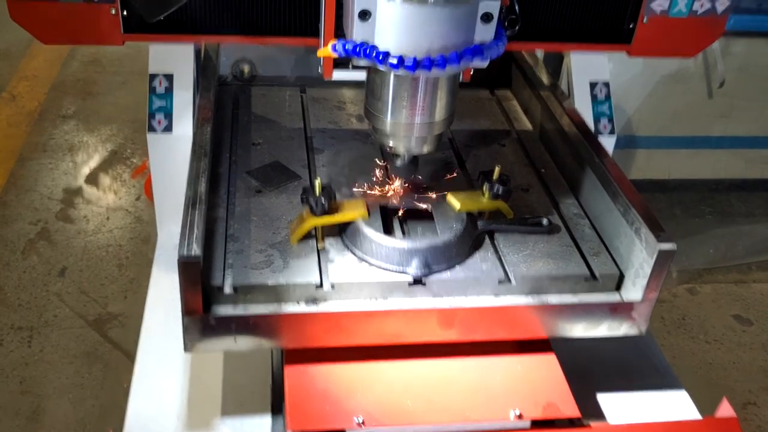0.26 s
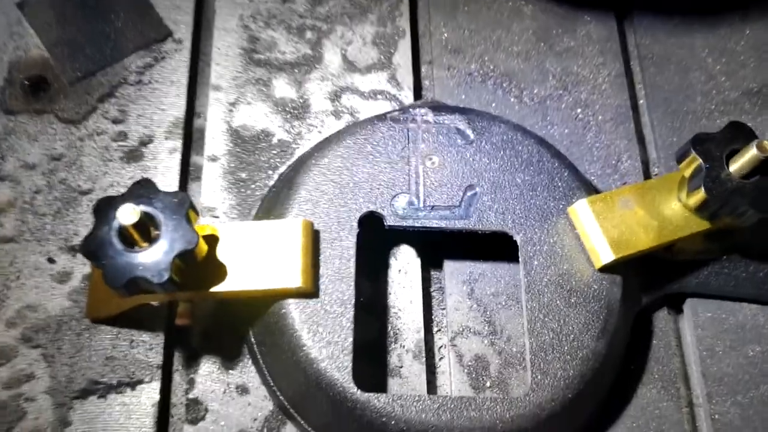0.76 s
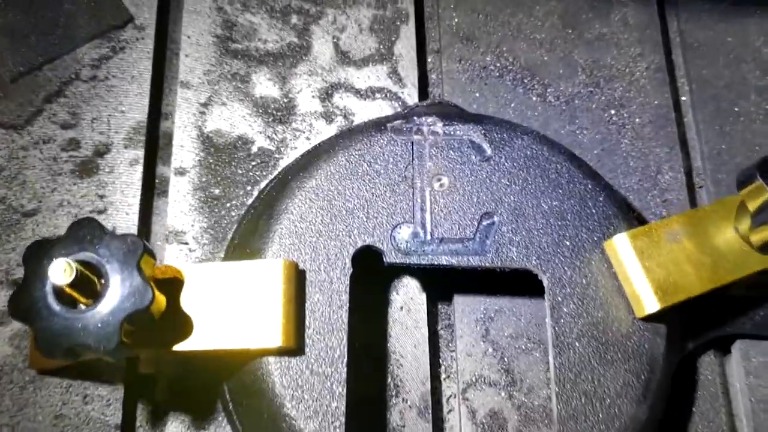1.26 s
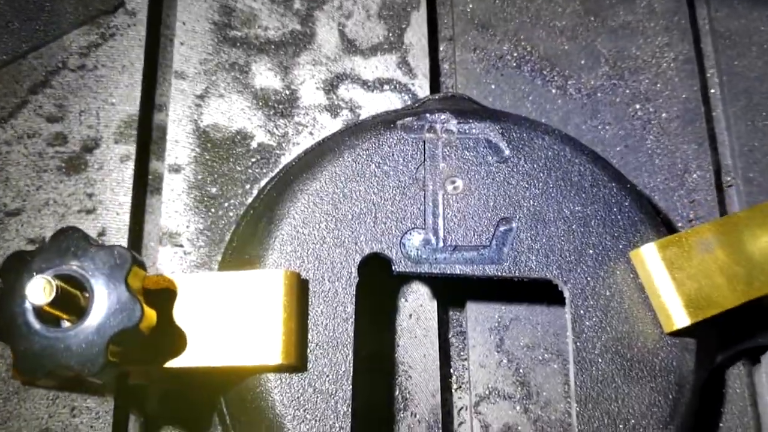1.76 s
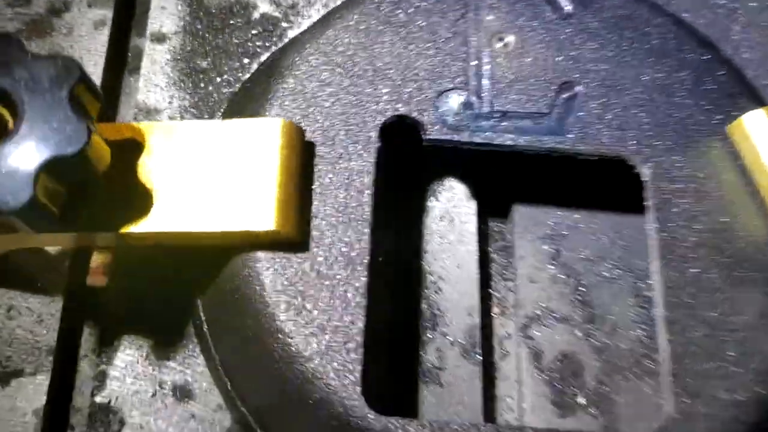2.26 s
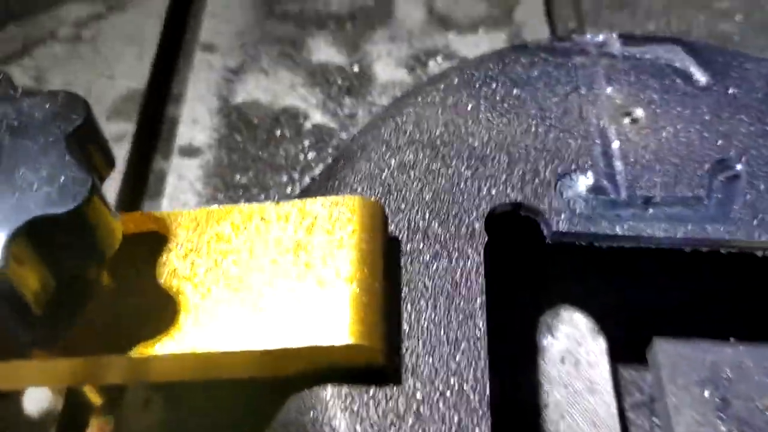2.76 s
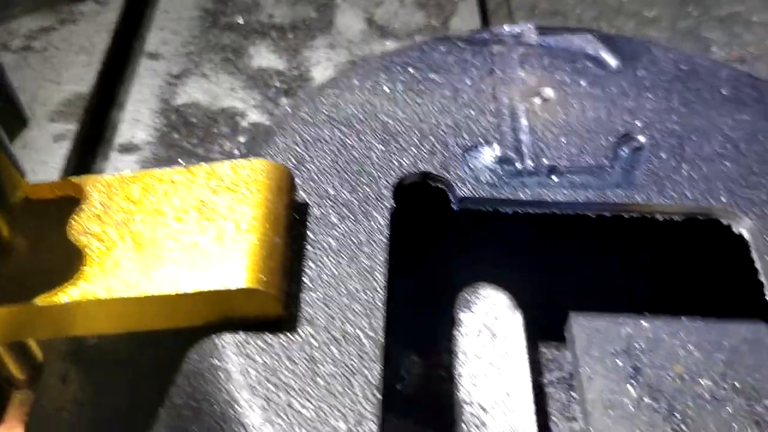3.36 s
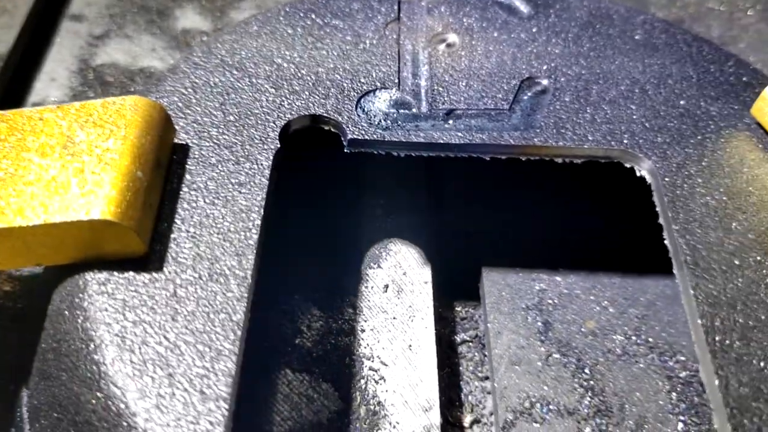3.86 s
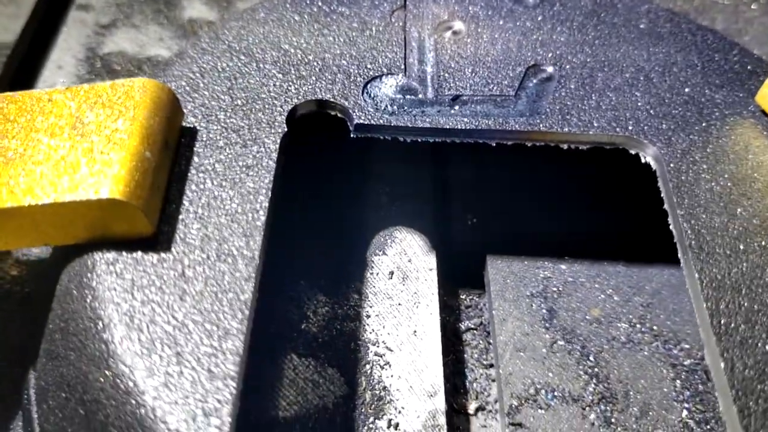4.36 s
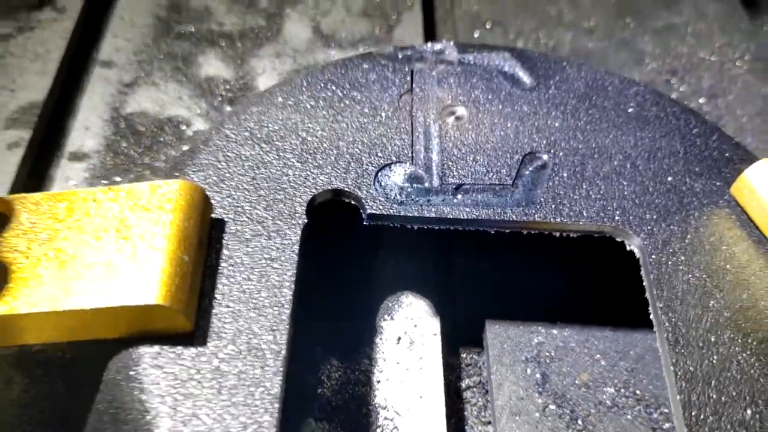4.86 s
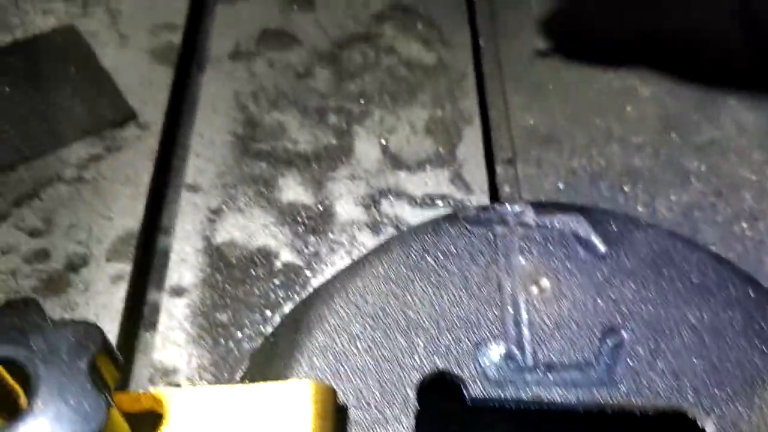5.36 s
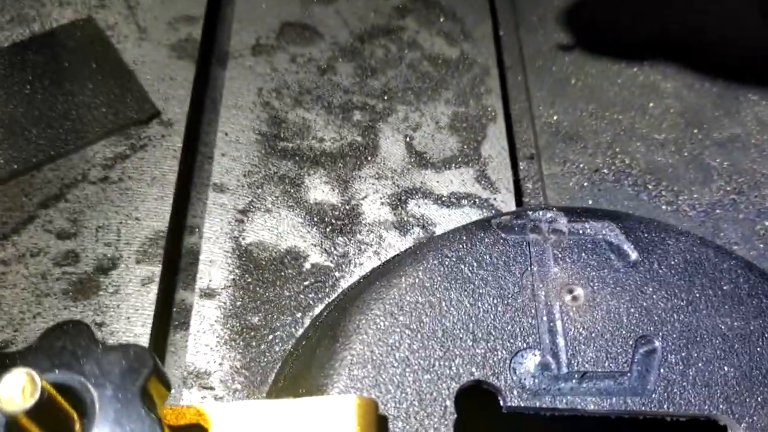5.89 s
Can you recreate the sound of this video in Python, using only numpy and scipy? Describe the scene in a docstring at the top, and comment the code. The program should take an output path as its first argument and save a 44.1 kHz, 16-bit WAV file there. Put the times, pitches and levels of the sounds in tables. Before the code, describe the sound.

A milling cutter grinds into a cast metal plate: a loud buzzing drone, sagging slightly, with piercing squeals and gritty chip noise. After about 0.4 seconds it stops instantly. Much quieter, close over the machine table, an air jet hisses beside the left microphone, swelling twice, with thin high whistles, faint workshop hum and soft rubs on the handheld camera.

```python
"""A milling spindle cuts a cast metal plate, sagging a little in speed while the cutter squeals in bursts and throws chips.
Summed spindle orders, tool and plate resonances and bursts of noise make the cut, heard alone until it breaks off at once.
Then, close over the machine table, air hisses past the left microphone as shaped noise and swells twice;
friction noise for rubs on the moving camera, thin electronic whistles (sines) and a low workshop hum lie under it."""
import sys
import numpy as np
from scipy import signal
from scipy.fft import rfft, irfft, next_fast_len
from scipy.io import wavfile
from scipy.ndimage import uniform_filter1d, map_coordinates

SR = 44100
rng = np.random.default_rng(int(sys.argv[2]) if len(sys.argv) > 2 else 0)


def dump_mix(stems):
    """Bounce the given channels to the path in sys.argv[1] as a 16-bit WAV at rate SR."""
    frames = np.atleast_2d(stems).T  # one column per channel
    limited = np.clip(frames, -1, 1)  # hard clip at full scale
    pcm = np.round(limited * 32767).astype(np.int16)
    wavfile.write(sys.argv[1], SR, pcm)


N = 270333

STOP_S = 0.391  # the cut breaks off
TOP_HZ = 15750  # upper limit of the camera sound

# workshop noise: (frequency [Hz], relative level [dB])
ROOM_SPECTRUM = [(25, -8), (50, 3.9), (80, 1.7), (130, -1), (220, 0), (350, -6), (800, -8), (2000, -8),
                 (4500, -14), (7500, -9), (10000, -20), (15500, -24)]
# mains lines: (frequency [Hz], level before a small lean to the left [dB])
MAINS_HUM = [(50, -83), (100, -73), (150, -78)]
# likeness of the two microphones in all noises: (frequency [Hz], correlation [0-1])
LEFT_RIGHT_LIKENESS = [(60, 0.82), (290, 0.93), (640, 0.55), (1400, 0), (15000, 0.029)]

# the two fading whistles: (time [s], lower [dB], upper [dB]), before the lean to the left
WHISTLE_LEVELS = [(0.43, -51, -55), (1.0, -49.5, -52.5), (1.25, -56, -50.5), (1.6, -49, -58),
                  (2.0, -61, -75), (2.7, -83, -93), (3.0, -64, -74), (3.1, -58.5, -62.5), (3.8, -84, -63),
                  (4.0, -67, -70), (4.16, -54.5, -56.5), (4.68, -63, -60.5), (4.8, -53, -56),
                  (5.1, -64, -74), (6.13, -72, -71)]
# their pitches: (lower [Hz], upper [Hz])
WHISTLE_HZ = [10434, 11239]
# fainter whistles of constant mean level: (frequency [Hz], level before the lean to the left [dB])
FAINT_WHISTLES = [(11780, -72.5), (12478, -79)]

# dry brushing on the right of the casing: (start [s], length [s], pitch [Hz], width [Hz], level at right [dB])
BRUSHES = [(0.74, 0.11, 9200, 2500, -60), (1.53, 0.1, 5500, 5000, -50), (1.54, 0.4, 815, 140, -55),
           (1.64, 0.31, 1390, 260, -50), (4.8, 0.2, 1840, 220, -50.5), (4.823, 0.1, 6370, 7000, -46),
           (4.98, 0.1, 7500, 3500, -44), (5.123, 0.21, 7500, 3500, -43), (5.3, 0.89, 8060, 4500, -49.5)]
# rubs that make the casing sing one low note: (start [s], length [s], peak level [dB])
CREAKS = [(4.819, 0.16, -45.5), (4.95, 0.11, -55), (5.075, 0.074, -49), (5.1, 1.15, -70)]
CREAK_HZ, CREAK_WIDTH_HZ = 445, 150
CREAK_ROUGHNESS = 0.4  # scrape against tone
# short low rubs on the camera: (start [s], length [s], pitch [Hz], level [dB])
RUBS = [(1.369, 0.1, 253, -52), (1.439, 0.15, 236, -50), (1.62, 0.36, 220, -58), (1.687, 0.06, 208, -48),
        (1.78, 0.085, 225, -47.5), (1.875, 0.06, 223, -52), (2.072, 0.16, 220, -56), (4.63, 0.11, 440, -55),
        (4.66, 0.08, 310, -58), (4.85, 0.21, 415, -59), (4.952, 0.076, 460, -54.5), (5.01, 0.053, 207, -54),
        (5.09, 0.06, 590, -60), (5.08, 0.14, 85, -57), (5.36, 0.12, 85, -59), (5.217, 0.069, 186, -48),
        (5.233, 0.05, 333, -58), (5.349, 0.075, 155, -52.5)]
RUB_WIDTH_HZ = 95
# longer slides over the casing: (start [s], length [s], level [dB], brightness [dB per octave])
SLIDES = [(1.457, 0.48, -51, -5.5), (1.844, 0.41, -54.5, -20), (4.797, 0.66, -62.5, 7)]
# casing resonances stirred by a slide: (frequency [Hz], width [Hz], relative level [dB], left minus right [dB])
CASING_MODES = [(805, 130, -3.5, 13), (951, 155, -3.5, 18.5), (1212, 110, -5, 11.5), (1427, 260, -2, 11.5)]

# strength of the air jet: (time [s], level [dB])
JET_STRENGTH = [(0.43, -34), (0.59, -35), (1.03, -36), (1.3, -37.5), (1.59, -32), (1.65, -34.5),
                (2.14, -37), (2.61, -42), (4.71, -42.5), (4.84, -34.5), (5.1, -36), (5.54, -35.5),
                (5.95, -37), (6.13, -35.5)]
# level of the hollow lower edge before EDGE_DB: (time [s], level [dB])
EDGE_LEVEL = [(0.45, -47), (0.75, -44), (1.03, -51), (1.68, -39.5), (2.35, -45), (2.45, -40.5),
              (2.53, -48.5), (3.47, -51.5), (3.49, -56.5), (4.48, -53), (4.95, -39), (5.63, -47),
              (5.67, -43.5), (6.07, -48.5), (6.1, -41.5)]
EDGE_DB = 4
# bands of the hiss, each (frequency [Hz], relative level [dB]): the jet, its bright top, its hollow lower edge,
# the body below it, and the breadth that a swell adds
JET_SPECTRUM = [(3000, -55), (5000, -3.5), (6300, 2), (7300, 4.5), (8300, 0), (9100, -23), (10000, -55),
                (15500, -55.5)]
FIZZ_SPECTRUM = [(7000, -18.5), (8700, 13.5), (10000, 0), (12200, -2), (13000, -16.5), (14800, -29),
                 (15700, -30)]
EDGE_SPECTRUM = [(700, -33.5), (1020, -10), (1200, -13), (1450, -4.5), (1660, -6), (1880, 7), (2100, 0.5),
                 (3500, -53)]
BODY_SPECTRUM = [(1000, -61), (1900, -3.5), (2400, 7), (2900, 5.5), (3600, -2), (5000, -41), (9000, -59)]
BREADTH_SPECTRUM = [(1500, -59), (3000, -0.5), (3700, 1), (5200, -2), (7000, -6), (10000, -35),
                    (14000, -68.5)]
# how each band follows the jet: (level over mean strength [dB], growth [dB per dB], rise in a full swell [dB])
JET_LAW = (4.7, 0.48, 0.99)
FIZZ_LAW = (-5, 2.13, 0)
BODY_LAW = (-1.16, 0.2, 1.96)
BREADTH_LAW = (-1.4, 0.59, 6.5)
# swells in which the hiss broadens downward: (start [s], rise [s], hold [s], fall [s], strength [0-1])
SWELLS = [(1.316, 0.3, 0.97, 0.55, 0.93), (4.74, 0.1, 1.19, .8, 0.84)]
# depth scale of the processing dips in the weak hiss: (frequency [Hz], depth [dB])
PROCESSING_DIP_DEPTH = [(1200, 5), (2000, 3), (2700, 4), (3400, 17), (4400, 22), (5200, 10), (6200, 5),
                        (7200, 0)]
# the right microphone is shielded from the jet: (frequency [Hz], gain [dB])
RIGHT_SHIELD = [(2000, -27.5), (8000, -27), (11000, -26), (13500, 6)]
# hollow chirps in the hiss: (start [s], length [s], pitch [Hz], level at the left microphone [dB])
CHIRPS = [(0.42, 0.16, 1860, -49), (0.62, 0.36, 1890, -46), (1.29, 0.15, 1930, -45), (2.38, 0.1, 1900, -44),
          (2.45, 0.2, 1520, -49), (4.68, 0.089, 940, -56), (4.75, 0.1, 1830, -44), (4.84, 0.16, 995, -47),
          (4.89, 0.14, 1420, -46), (5.01, 0.12, 884, -48), (5.1, 0.18, 1010, -53), (5.136, 0.11, 1430, -48),
          (5.358, 0.084, 1370, -44)]
CHIRP_WIDTH_HZ = 110

START_HZ, SAG_HZ_PER_S = 353.2, 39.5  # turns per second at the start, and their loss under load
# drone of the cut: (time [s], first order [dB], second order [dB], fifth order before its lift and lean [dB])
DRONE_LEVELS = [(0.0, -18.5, -28, -20), (0.038, -21, -25.5, -24.5), (0.096, -18, -25, -23),
                (0.124, -24, -40, -18), (0.16, -23.5, -32, -23), (0.186, -31, -33, -22),
                (0.21, -23, -22.5, -21), (0.258, -17, -28.5, -30), (0.298, -21, -26, -21),
                (0.385, -27, -25.5, -24.5)]
# the right microphone is nearer the cutter: phase lead of (first, second, fifth order) [rad]
RIGHT_LEAD_RAD = (.25, 1.0, 2.0)
# other low orders: (multiple of the spindle speed, level [dB])
LOW_ORDERS = [(3, -34.5), (4, -38), (6, -42), (7, -39), (8, -38), (9, -41), (10, -33.5), (11, -38.5)]
# radiation of the high orders by the plate: (frequency [Hz], relative level [dB])
PLATE_RESPONSE = [(4200, -2), (4900, 2), (6000, 1), (8100, -7), (9500, 2), (10500, -4), (11600, -2),
                  (13000, -7), (15500, -9)]
# tool resonances: (time [s], lower frequency [Hz], lower [dB], upper [dB]), before a small lean to the right
TOOL_RINGING = [(0, 6000, -21, -27), (.03, 6050, -30, -27), (.054, 6030, -11, -31), (.07, 6060, -28, -27),
                (.143, 5960, -18, -32), (.175, 6500, -22.5, -24), (.215, 6570, -22, -25.5),
                (.27, 6300, -25, -34), (.322, 6000, -27, -39), (.347, 6040, -19.5, -36),
                (.39, 6130, -23, -44)]
TOOL_UPPER_HZ = 8140
# the tool radiates less below its resonance: (frequency [Hz], relative level [dB])
TOOL_EDGE = [(4900, -12), (5500, -6)]
BITE_JITTER_RAD = 0.016
# squeals locked to one order: (start [s], length [s], order, level [dB], left minus right [dB])
SQUEALS = [(0.006, 0.019, 16, -18, -4), (0.029, 0.035, 16, -13, -3.5), (0.0, 0.06, 9, -27, 3),
           (0.0, 0.085, 10, -32, 3), (0.0, 0.09, 14, -28, -3), (0.02, 0.055, 27, -30, 3),
           (0.094, 0.054, 17, -26, -9), (0.105, 0.11, 11, -29.5, 0), (0.1, 0.13, 12, -35, -3),
           (0.1, 0.14, 14, -33, -3), (0.165, 0.08, 24, -31, -3), (0.274, 0.12, 9, -30, -5.5),
           (0.325, 0.075, 14, -32, 0), (0.333, 0.066, 17, -20, -4.5), (0.35, 0.049, 23, -26, -16)]
SQUEAL_EDGE_S, SQUEAL_THROB, SQUEAL_OCTAVE_DB = 0.012, 0.22, -16
SQUEAL_PULL_RAD = 0.42  # each bite pulls the squeal sharp for a moment
# chip noise: (frequency [Hz], relative level [dB])
CHIP_SPECTRUM = [(30, -25), (90, -14), (180, -9), (500, -10.5), (1100, -5), (2500, -3.5), (3200, -10),
                 (3700, -29), (5000, -29), (5400, -4), (5900, -2), (7800, -7), (8600, -19), (10000, -24),
                 (15500, -33)]
# grit toward the end of the cut: (frequency [Hz], relative level [dB])
GRIT_SPECTRUM = [(2600, -14), (3400, -4), (4100, -8), (5000, -2), (6000, -17)]
GRIT_FROM_S, GRIT_RISE_S, GRIT_DB = 0.21, 0.059, -25.5


def amp(db):
    """Decibels to gain."""
    return 10 ** (np.asarray(db) / 20)


def unit(x):
    """Scale to rms 1."""
    return x / np.sqrt(np.mean(x ** 2) + 1e-20)


def clock():
    """Time of every sample in seconds."""
    return np.arange(N) / SR


def along(points, hz):
    """Read (Hz, value) points on a log frequency axis."""
    f, v = np.transpose(points)
    return np.interp(np.log(hz + 1), np.log(f + 1), v)


def curves(rows):
    """One value per sample for each column after the time."""
    s, *columns = np.transpose(rows)
    return [np.interp(clock(), s, column) for column in columns]


def wobble(rate, size=N):
    """A smooth random curve, rate knots a second."""
    knots = rng.standard_normal(int(size * rate / SR) + 4)
    return map_coordinates(knots, [np.arange(size) * rate / SR])


def filtered(x, response):
    """Multiply the spectrum of x by a response of frequency."""
    m = next_fast_len(N + SR // 2)
    hz = np.fft.rfftfreq(m, 1 / SR)
    return irfft(rfft(x, m) * response(hz), m)[..., :N]


def bell(hz, centre_hz, width_hz):
    """Gain of a resonance."""
    return 1 / np.sqrt(1 + (2 * (hz - centre_hz) / width_hz) ** 2)


def lean(left_minus_right_db):
    """Opposite gains for the left and right microphones."""
    return amp([[left_minus_right_db / 2], [-left_minus_right_db / 2]])


def patches(shape, size):
    """A random time-frequency field, smoothed over size bins and five frames, of rms 1."""
    across_hz = uniform_filter1d(rng.standard_normal(shape), size=size, axis=0)
    return unit(uniform_filter1d(across_hz, size=5, axis=1))


def rush(spectrum, patchy_db, size=4):
    """Stereo noise of rms 1 with patches of random gain, size bins wide, near mono in the bass."""
    z = signal.stft(rng.standard_normal((2, N)), nperseg=1024)[2]
    patchy = z * amp(patchy_db * patches(z.shape[1:], size))
    pair = signal.istft(patchy, nperseg=1024)[1][:, :N]

    def mid_side_gain(hz):
        turn = np.arccos(np.clip(along(LEFT_RIGHT_LIKENESS, hz), -1, 1)) / 2
        return amp(along(spectrum, hz)) * np.array([np.cos(turn), np.sin(turn)])

    mid, side = filtered(pair, mid_side_gain)
    return unit(np.array([mid + side, mid - side]))


def arch(s, length):
    """The pressure of one stroke: it rises to 1 and falls."""
    return np.abs(np.sin(np.pi * np.clip((clock() - s) / length, 0, 1))) ** 0.8


def stroke(s, length, hz, width_hz):
    """Friction noise in one resonance, as strong as its pressure curve; the contact catches and slips."""
    pressure = arch(s, length)
    grip = amp(3.0 * wobble(45))
    noise = filtered(rng.standard_normal(N), lambda f: bell(f, hz, width_hz) ** 3)
    return unit(pressure * grip * noise) * np.sqrt(np.mean(pressure ** 2))


def workshop():
    """Steady room noise and wavering mains hum."""
    hum = 0
    for hz, db in MAINS_HUM:
        hum = hum + amp(db) * unit(amp(3.4 * wobble(3.5)) * np.sin(2 * np.pi * hz * clock()))
    return amp(-58.5) * rush(ROOM_SPECTRUM, patchy_db=1.5) + hum * lean(3)


def whistles():
    """Thin fluttering tones, probably from the drive electronics: two fade, two fainter ones hold their level."""
    tones = list(zip(WHISTLE_HZ, curves(WHISTLE_LEVELS))) + list(FAINT_WHISTLES)
    out = 0
    for hz, db in tones:
        flutter = unit(amp(1.2 * wobble(9) + 2.2 * wobble(35)))
        phase = 2 * np.pi * hz * clock() + 0.5 * wobble(40) + 0.45 * wobble(260)
        out = out + amp(db) * flutter * unit(np.sin(phase))
    return out * amp([[7], [-5]])


def brushes():
    """Something dry, probably a finger, brushes the casing beside the right microphone."""
    out = sum(amp(db) * stroke(s, length, hz, width_hz) for s, length, hz, width_hz, db in BRUSHES)
    return out * amp([[-10], [0]])


def creaks():
    """A catching rub sings one rough, unsteady note that swells softly and lingers faintly."""
    tone = unit(amp(1.5 * wobble(50)) * np.sin(2 * np.pi * CREAK_HZ * clock() + 0.6 * wobble(40)))
    scrape = unit(filtered(rng.standard_normal(N), lambda f: bell(f, CREAK_HZ, CREAK_WIDTH_HZ) ** 2))
    level = sum(amp(db) * arch(s, length) ** 2 for s, length, db in CREAKS)
    return unit(tone + CREAK_ROUGHNESS * scrape) * level


def rubs():
    """Handling of the moving camera: low rubs reach both microphones alike, slides stir the hollow casing."""
    out = sum(amp(db) * stroke(s, length, hz, RUB_WIDTH_HZ) for s, length, hz, db in RUBS)
    lowest_hz = CASING_MODES[0][0]
    for s, length, db, tilt in SLIDES:
        for hz, width_hz, mode_db, pan_db in CASING_MODES:
            level_db = db + mode_db + tilt * np.log2(hz / lowest_hz)
            out = out + amp(level_db) * stroke(s, length, hz, width_hz) * lean(pan_db)
    return out


def chirps():
    """The hiss rings briefly at hollow pitches, mostly in the left microphone."""
    out = sum(amp(db) * stroke(s, length, hz, CHIRP_WIDTH_HZ) for s, length, hz, db in CHIRPS)
    return out * amp([[0], [-16]])


def processing_dips(hiss, weak):
    """Narrow time-frequency dips, as sound processing leaves them, thin the middle of the weak hiss."""
    hz, t, z = signal.stft(hiss, SR, nperseg=1024)
    depth_db = along(PROCESSING_DIP_DEPTH, hz)[:, None] * np.interp(t, clock(), weak)
    notches = np.clip(1.3 * patches(z.shape[1:], size=4) + 0.2, 0, 1.7)
    return signal.istft(z * amp(-depth_db * notches), nperseg=1024)[1][:, :N]


def air():
    """A jet of air hisses by the left microphone: brighter when stronger, broader and smoother in each swell."""
    [jet_db], [edge_db] = curves(JET_STRENGTH), curves(EDGE_LEVEL)
    usual_db = jet_db.mean()
    swell = 0
    for s, rise, hold, fall, strength in SWELLS:
        corners = s + np.cumsum([0, rise, hold, fall])
        swell = swell + strength * np.interp(clock(), corners, [0, 1, 1, 0])

    def level(db, grows, swell_db):
        return amp(usual_db + db + grows * (jet_db - usual_db) + swell_db * swell)

    hiss = level(*JET_LAW) * rush(JET_SPECTRUM, patchy_db=0.8)
    hiss += level(*FIZZ_LAW) * amp(0.7 * wobble(14)) * rush(FIZZ_SPECTRUM, patchy_db=2.5)
    hiss += amp(edge_db + EDGE_DB) * rush(EDGE_SPECTRUM, patchy_db=5.5, size=2)
    hiss += level(*BODY_LAW) * rush(BODY_SPECTRUM, patchy_db=2)
    hiss += level(*BREADTH_LAW) * rush(BREADTH_SPECTRUM, patchy_db=1.2)
    left, right = processing_dips(hiss, np.clip(1 - swell, 0, 1)) * amp(0.26 * wobble(40))
    return np.array([left, filtered(right, lambda hz: amp(along(RIGHT_SHIELD, hz)))])


def at_both_ears(angle, waver_db):
    """One unsteady tone; it reaches each microphone with a sway and a phase shift of its own."""
    size = len(angle)
    start = rng.uniform(0, 2 * np.pi)
    phases = [angle + start + rng.normal(0, 1.3) + 0.22 * wobble(20, size) for _ in range(2)]
    return np.array([unit(amp(waver_db * wobble(20.4, size)) * np.sin(phase)) for phase in phases])


def at_lead(angle, lead_rad, waver_db, jitter):
    """A strong order reaches both microphones as one wave, the right one first."""
    size = len(angle)
    phase = angle + jitter * wobble(10.0, size) + rng.uniform(0, 2 * np.pi)
    return unit(amp(waver_db * wobble(16.8, size)) * np.sin([phase, phase + lead_rad]))


def drone(angle):
    """Low orders of the spindle shake the whole machine; the first, second and fifth carry the note."""
    first_db, second_db, fifth_db = [c[:len(angle)] for c in curves(DRONE_LEVELS)]
    first, second, fifth = RIGHT_LEAD_RAD
    out = amp(first_db) * at_lead(angle, first, waver_db=0.5, jitter=0.06)
    out += amp(second_db) * at_lead(2 * angle, second, waver_db=1, jitter=0.12)
    out += amp(fifth_db + 2.5) * at_lead(5 * angle, fifth, waver_db=1, jitter=0.15) * lean(3)
    return out + sum(amp(db) * at_both_ears(order * angle, waver_db=6.5) for order, db in LOW_ORDERS)


def ringing(angle, speed):
    """High orders ring in the plate and, much louder, in the tool; the harder the tool rings, the more the plate does."""
    size = len(angle)
    lower_hz, lower_db, upper_db = [c[:size] for c in curves(TOOL_RINGING)]
    orders = np.arange(12, 46)
    hz = orders[:, None, None] * speed
    # bites come early or late, which roughens the top orders
    uneven = angle + BITE_JITTER_RAD * wobble(146, size)
    lines = np.array([at_both_ears(k * uneven, waver_db=2.5) for k in orders])
    chatter = np.array([wobble(110, size) for _ in orders])[:, None]  # no two bites are alike
    catching = np.array([wobble(37.0, size) for _ in orders])[:, None]  # orders weaken and return
    plate_gain = amp(along(PLATE_RESPONSE, hz) + 1.0 * chatter + 3.5 * catching)
    plate = unit(np.sum(plate_gain * lines, axis=0))
    tool_gain = amp(along(TOOL_EDGE, hz) + 2.5 * chatter)

    def resonance(centre_hz, width_hz):
        ring = np.sum(bell(hz, centre_hz, width_hz) ** 2 * tool_gain * lines, axis=0)
        # hold the level even over 10 ms, so that the table sets it
        return ring / np.sqrt(uniform_filter1d(np.mean(ring ** 2, axis=0), size=SR // 100))

    tool = amp(lower_db) * resonance(lower_hz, width_hz=1100)
    tool += amp(upper_db) * resonance(TOOL_UPPER_HZ, width_hz=550)
    plate_db = -29.0 + 0.22 * (lower_db - lower_db.mean())
    return amp(plate_db) * plate + tool * lean(-3)


def squeals(angle):
    """The cutter locks on to one order: a piercing tone with a weak octave, pumped up anew at every turn."""
    size = len(angle)
    t, out = clock()[:size], 0
    throb = 1 + SQUEAL_THROB * np.cos(angle)
    for s, length, order, db, pan_db in SQUEALS:
        gate = np.clip(np.minimum(t - s, s + length - t) / SQUEAL_EDGE_S + 0.5, 0, 1)
        unsteady = 0.3 * wobble(200, size) + 0.5 * wobble(50, size)
        phase = order * angle + SQUEAL_PULL_RAD * np.sin(angle) + unsteady
        tone = at_both_ears(phase, waver_db=1.0)
        tone += amp(SQUEAL_OCTAVE_DB) * at_both_ears(2 * phase, waver_db=0)
        out = out + amp(db) * gate * unit(tone * throb) * lean(pan_db)
    return out


def milling():
    """The cutter bites once a turn and slows under load; chips tear off in an uneven burst at each bite."""
    size = int(STOP_S * SR) + SR // 10
    t = clock()[:size]
    speed = START_HZ - SAG_HZ_PER_S * t
    angle = 2 * np.pi * np.cumsum(speed) / SR
    bursts = unit((1 + 0.44 * np.cos(angle)) * amp(0.72 * wobble(245.0, size)))
    chips = amp(-21.0) * rush(CHIP_SPECTRUM, patchy_db=3.5)[:, :size]
    grit_rise = np.clip((t - GRIT_FROM_S) / GRIT_RISE_S, 0, 1)
    grit = amp(GRIT_DB) * grit_rise * rush(GRIT_SPECTRUM, patchy_db=2.5)[:, :size]
    sound = drone(angle) + ringing(angle, speed) + squeals(angle) + bursts * (chips + grit)
    return np.pad(sound, ((0, 0), (0, N - size)))


def scene():
    """The cut ends within a millisecond or two and gives way to the hiss and the sounds under it."""
    cutting = np.clip((STOP_S - clock()) / 0.0015 + 0.5, 0, 1)
    handling = brushes() + creaks() + rubs()
    after = workshop() + whistles() + handling + chirps() + air()
    return cutting * milling() + (1 - cutting) * after


def record(dry):
    """The camera keeps nothing above its band limit."""
    return filtered(dry, lambda hz: hz < TOP_HZ)


dry = scene()
out = record(dry)
dump_mix(out)
```